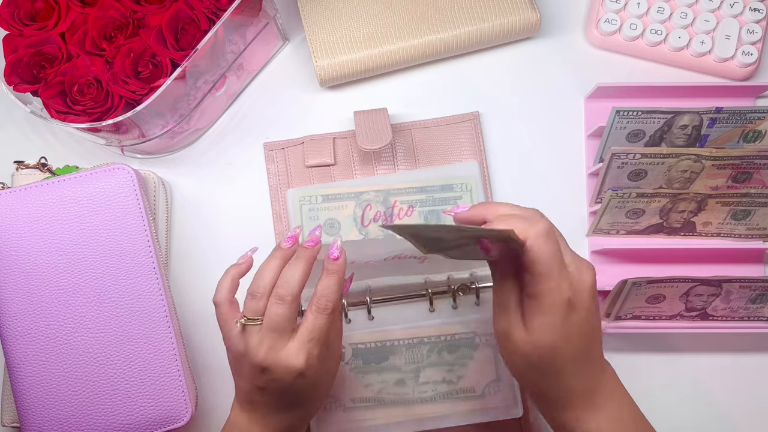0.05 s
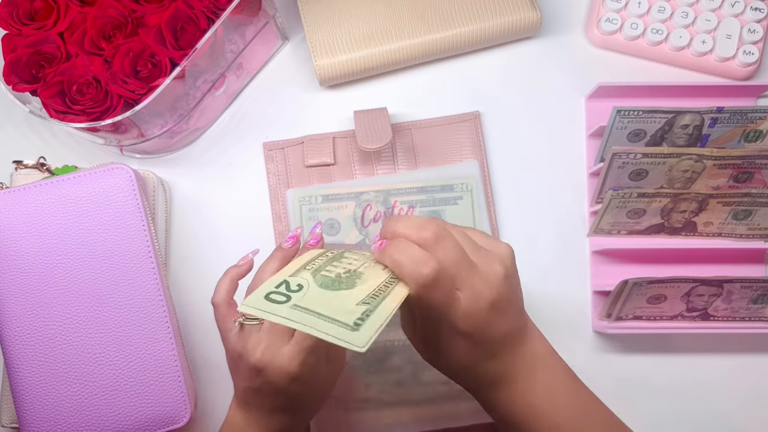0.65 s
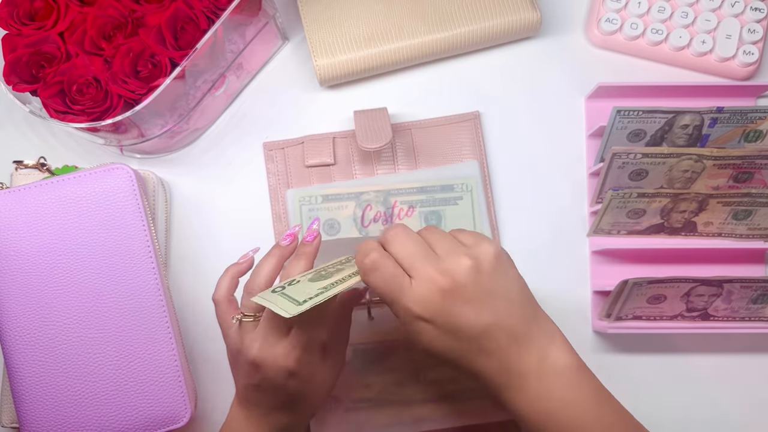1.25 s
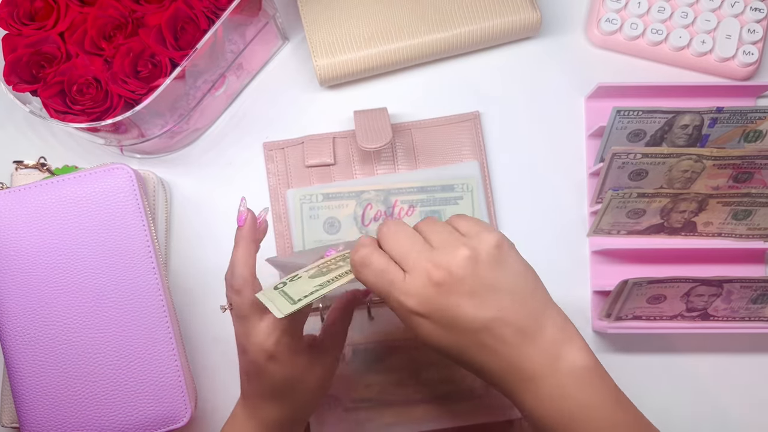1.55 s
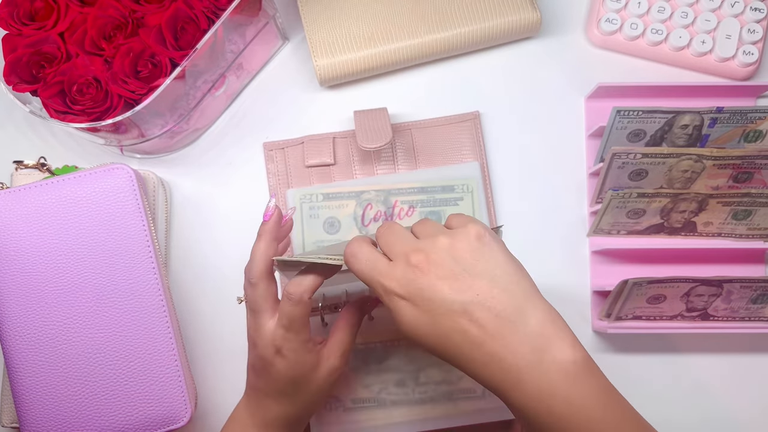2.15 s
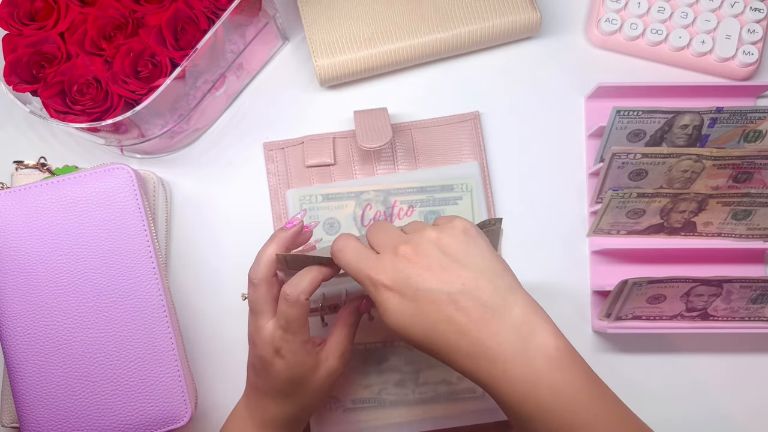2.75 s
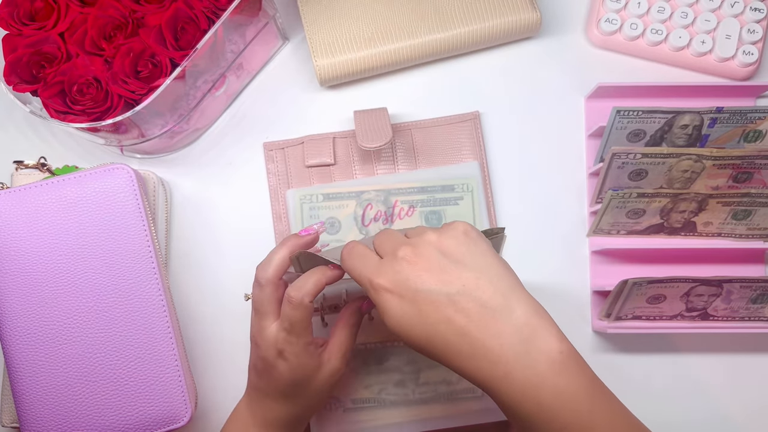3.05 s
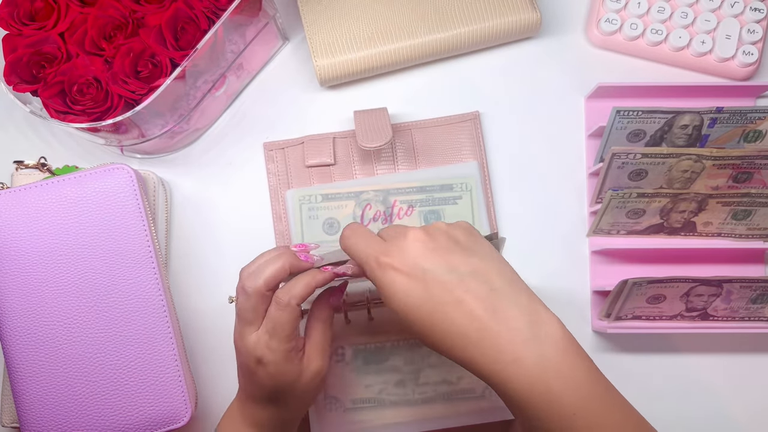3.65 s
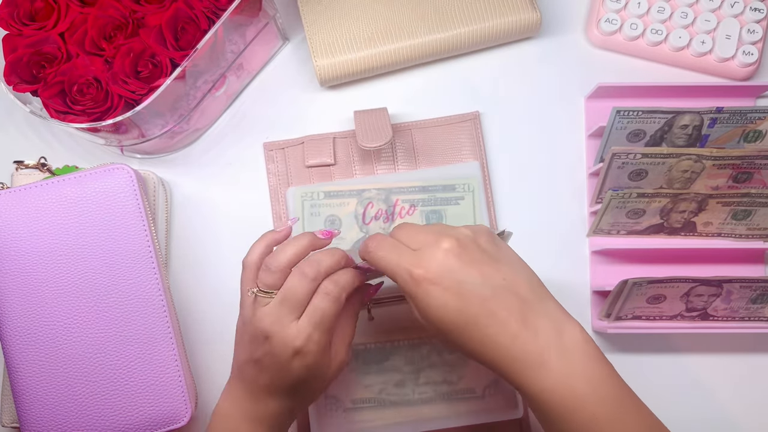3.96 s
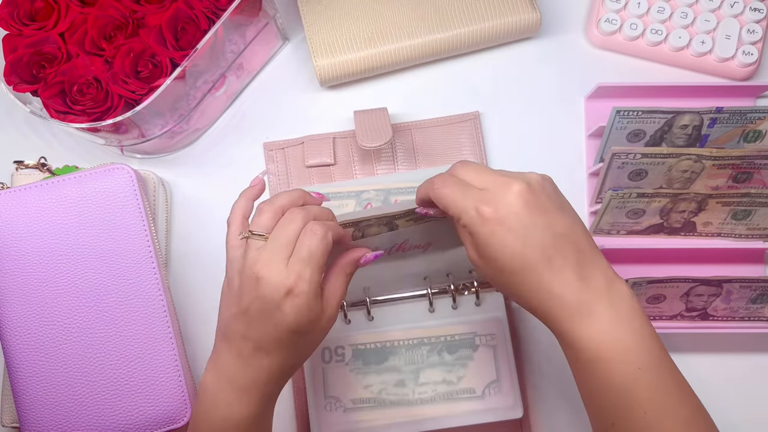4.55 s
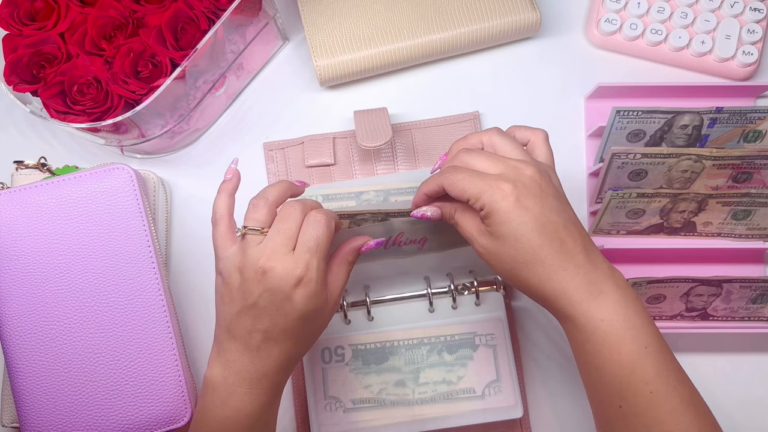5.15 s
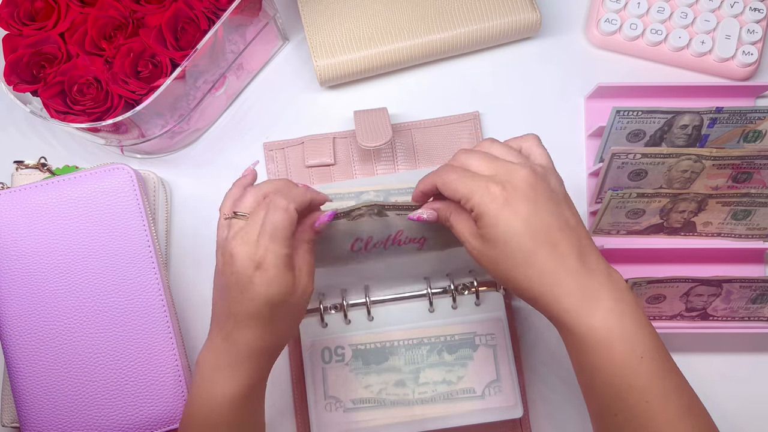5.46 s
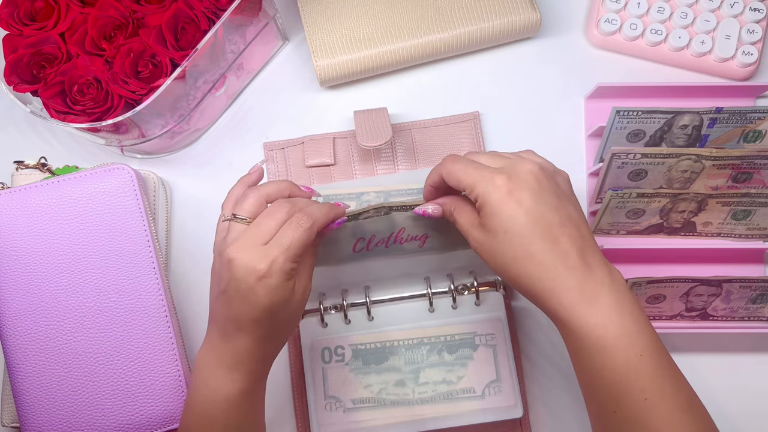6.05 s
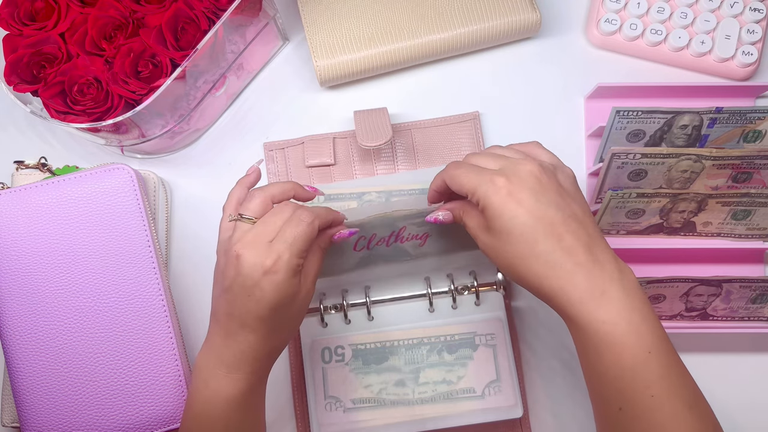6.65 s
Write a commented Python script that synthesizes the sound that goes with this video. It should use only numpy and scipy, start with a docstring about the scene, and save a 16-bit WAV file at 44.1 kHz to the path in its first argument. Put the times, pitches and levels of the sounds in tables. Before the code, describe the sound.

Paper banknotes rustle and crinkle as they are pushed into a plastic binder pocket, with small snaps over a steady low hum.

```python
"""A desk in a small room with a steady low hum. Close by, hands work a few banknotes into the
plastic pocket of a binder. Each short push of the fingers drags paper over plastic, so it hisses,
rubs and crinkles. Notes and pocket buckle with short snaps, and the binder answers with soft knocks.
Now and then a note's edge chatters along the plastic and sets a narrow resonance singing."""
import sys
import numpy as np
from scipy import signal
from scipy.fft import rfft, irfft, next_fast_len
from scipy.io import wavfile
from scipy.ndimage import uniform_filter1d, map_coordinates

SR = 44100
rng = np.random.default_rng(int(sys.argv[2]) if len(sys.argv) > 2 else 0)


def int16_out(signal):
    """Quantize to a 16-bit WAV file."""
    q = np.round(np.clip(np.atleast_2d(signal).T, -1, 1) * 32767)
    wavfile.write(sys.argv[1], SR, q.astype(np.int16))


N = 300762


def amp(db):
    """Decibels to gain."""
    return 10 ** (np.asarray(db) / 20)


def unit(x):
    """Scale to rms 1."""
    return x / np.sqrt(np.mean(x ** 2) + 1e-20)


def along(points, hz):
    """Read a curve of (freq_hz, value) points on a log frequency axis."""
    freqs, values = np.transpose(points)
    return np.interp(np.log(hz + 1), np.log(freqs + 1), values)


def wobble(rate_hz):
    """A smooth random modulator with rate_hz knots a second."""
    knots = rng.standard_normal(int(N * rate_hz / SR) + 4)
    return map_coordinates(knots, [np.arange(N) * rate_hz / SR])


def filtered(x, response):
    """Filter x by a gain given as a function of frequency."""
    n = x.shape[-1]
    padded = next_fast_len(n + 4096)
    return irfft(rfft(x, padded) * response(np.fft.rfftfreq(padded, 1 / SR)), padded)[..., :n]


def colour(x, spectrum, peaks=()):
    """Shape x with a broad EQ curve and resonant peaks, at rms 1."""
    def bumps_db(hz):
        return sum(db / (1 + (2 * (hz - centre) / width) ** 2) for centre, width, db in peaks)
    return unit(filtered(x, lambda hz: amp(along(spectrum, hz) + bumps_db(hz))))


def shimmer(x, depth_db):
    """Narrow peaks come and go in the sound, as they do when a sheet bends."""
    bands = signal.stft(x, nperseg=512)[2]
    drift = uniform_filter1d(rng.standard_normal(bands.shape), size=3, axis=0)  # smooth across bands
    drift = uniform_filter1d(drift, size=16, axis=1)  # and over time
    gain = amp(depth_db * unit(drift))
    return signal.istft(bands * unit(gain), nperseg=512)[1][:len(x)]


# The appliance's low rumble: freq_hz, gain_db
RUMBLE_EQ = [(22, -25), (31, -12), (40, -9), (47, 0.5), (55, 9.5), (66, 11.5), (78, 0.5), (92, 5),
             (110, -5), (130, -2.5), (146, 7), (158, -5), (170, -0.5), (200, -19), (300, -77)]
# The faint rush of air: freq_hz, gain_db
AIR_EQ = [(100, 2.5), (230, 2.5), (400, -6), (750, -21), (1900, -12.5), (3000, -35), (6000, -32),
          (10000, -39.5), (11500, -57.5), (16000, -72)]


def appliance_hum(hum_hz, hum_db, rumble_db, air_db):
    """An appliance drones at twice the mains rate over its own rumble and a faint rush of air."""
    tone = np.sqrt(2) * np.sin(2 * np.pi * hum_hz * np.arange(N) / SR)
    drone = tone * amp(hum_db + 0.44 * wobble(rate_hz=3.14))
    rumble = amp(rumble_db) * colour(rng.standard_normal(N), RUMBLE_EQ)
    air = amp(air_db) * colour(rng.standard_normal(N), AIR_EQ)
    return drone + rumble + air


# Light touch of notes and fingers on the pocket between strokes: time_s, hiss_db, rub_db
LIGHT_TOUCH = [(0, -66, -65), (0.23, -84.5, -80), (0.5, -64.5, -66.5), (0.76, -80, -100), (0.92, -84, -94),
               (1.04, -73, -75.5), (1.55, -88, -76.5), (2.0, -68.5, -68), (3.0, -69.5, -68.5),
               (4.15, -62, -60.5), (4.33, -71, -71.5), (4.53, -65.5, -61.5), (4.68, -82.5, -88),
               (5.03, -66, -62.5), (5.45, -67.5, -66.5), (5.61, -75.5, -76), (5.93, -69.5, -69),
               (6.8, -83.5, -77)]
# Pushes that slide the notes and rub the pocket: fastest_s, length_s, hiss_db, rub_db
FINGER_STROKES = [(0.076, 0.068, -58.5, -55.5), (0.32, 0.066, -76, -58.5), (0.464, 0.15, -51.5, -83),
                  (0.53, 0.12, -63.5, -58), (0.59, 0.062, -49, -61.5), (1.099, 0.12, -61.5, -62.5),
                  (1.279, 0.19, -56, -89), (1.388, 0.11, -52, -53), (1.599, 0.094, -57, -99),
                  (1.787, 0.1, -57.5, -71), (1.961, 0.13, -50, -52.5), (2.07, 0.1, -54.5, -59),
                  (2.207, 0.073, -55, -60), (2.322, 0.027, -55, -53), (2.376, 0.079, -57, -55.5),
                  (2.572, 0.15, -57.5, -55.5), (2.669, 0.16, -57, -62), (2.877, 0.11, -56.5, -55),
                  (3.03, 0.11, -52.5, -58), (3.241, 0.22, -55.5, -58), (3.429, 0.082, -53.5, -62.5),
                  (3.551, 0.052, -58.5, -56), (3.621, 0.06, -66.5, -70), (3.99, 0.071, -56, -58),
                  (4.102, 0.06, -52, -53.5), (4.163, 0.12, -52.5, -68), (4.414, 0.073, -60.5, -62),
                  (4.782, 0.073, -53, -57), (4.931, 0.15, -59.5, -64.5), (5.195, 0.028, -67, -54.5),
                  (5.446, 0.091, -64, -53), (5.714, 0.044, -59.5, -55.5), (5.878, 0.066, -61.5, -75),
                  (6.023, 0.053, -64.5, -52), (6.155, 0.059, -61.5, -65.5), (6.345, 0.036, -64, -53.5),
                  (6.434, 0.075, -65, -57), (6.506, 0.045, -67.5, -59.5), (6.698, 0.087, -61.5, -52)]


def hand_motion():
    """Hiss and rub envelopes in dB: light touch, swelling strokes and sheets settling after a snap."""
    t = np.arange(N) / SR
    touch_s, *touch_levels = np.transpose(LIGHT_TOUCH)
    power = amp([np.interp(t, touch_s, db) for db in touch_levels]) ** 2
    rise_share, roundness = 0.48, 1.29  # part of a stroke spent speeding up; 1 = pointed, 2 = round
    for fastest_s, length_s, hiss_db, rub_db in FINGER_STROKES:
        near = slice(*np.searchsorted(t, [fastest_s - 2 * length_s, fastest_s + 2 * length_s]))
        slope_s = length_s * np.where(t[near] < fastest_s, rise_share, 1 - rise_share)
        swell = np.exp(-(np.abs(t[near] - fastest_s) / slope_s) ** roundness)
        power[:, near] += (amp([[hiss_db], [rub_db]]) * swell) ** 2
    settle_hiss_db, settle_rub_db, settle_s = -27.5, -15.5, 0.2  # rustle under the snap and the knock
    for start_s, snap_db, _, knock_db, _ in BUCKLES:
        after = slice(*np.searchsorted(t, [start_s, start_s + settle_s]))
        fade = amp(-60 * (t[after] - start_s) / settle_s)
        power[:, after] += (amp([[snap_db + settle_hiss_db], [knock_db + settle_rub_db]]) * fade) ** 2
    return 10 * np.log10(power)


def crinkles(rate_hz, spread_db):
    """Envelope of small creases that pop at random, each dying in milliseconds; peaks near 1."""
    pops = (rng.random(N) < rate_hz / SR) * amp(spread_db * np.minimum(rng.standard_normal(N), 1))
    t60_s = 0.017
    tick = amp(-60 * np.arange(SR // 20) / SR / t60_s)
    return signal.fftconvolve(pops, tick)[:N]


def friction(rate_hz, spread_db, grain_db):
    """Smooth drag of the fibres plus a grain of tiny, uneven slips."""
    slips = (rng.random(N) < rate_hz / SR) * rng.choice([-1, 1], N)
    sizes = amp(spread_db * np.minimum(rng.standard_normal(N), 2))
    return rng.standard_normal(N) + amp(grain_db) * unit(slips * sizes)


# Bright hiss of sliding paper: freq_hz, gain_db
HISS_EQ = [(500, -65), (1200, -8.5), (2000, -3.5), (2600, -0.5), (4000, 1), (5500, -6.5), (7500, -19),
           (11000, -49)]
# Fine fizz on top of the hiss: freq_hz, gain_db
FIZZ_EQ = [(3500, -5.5), (6200, -1.5), (8000, -2), (10000, -3.5), (11300, -46), (15500, -25)]
# Dull rub of the pocket: freq_hz, gain_db
RUB_EQ = [(250, -20.5), (450, -10.5), (600, -0.5), (850, -2), (1150, -2.5), (1700, -7.5), (3000, -71)]
# Low thud of the binder: freq_hz, gain_db
THUD_EQ = [(100, -0.5), (200, -0.5), (300, 3), (480, -1.5), (700, -24), (1200, -69)]
# Resonances of the plastic pocket: pitch_hz, width_hz, boost_db
POCKET_MODES = [(2040, 280, 5.6), (2360, 280, 5), (2830, 110, 3.3), (3600, 30, 2.6), (4400, 490, 2.1),
                (6160, 550, 6.8)]
# Resonances of the binder: pitch_hz, width_hz, boost_db
BINDER_MODES = [(302, 180, 3), (429, 32, 5), (649, 46, 11), (803, 95, 8.5), (1036, 44, 7.5), (1320, 150, 5)]
# The hand's weight on the binder, heavy when pushing, light on the fingertips: time_s, thud_gain_db
HAND_WEIGHT = [(0, -4), (2.0, 0.5), (4.2, -5), (4.6, -6.5), (5.5, -2.5), (6.0, -6), (6.8, -12)]


def sliding_notes(hiss_trim_db, fizz_trim_db, rub_trim_db, thud_trim_db, flutter_db):
    """Notes drag and crinkle in the pocket, brighter when faster, fluttering under an uneven push."""
    hiss_db, rub_db = hand_motion()
    brisk_db, fizz_growth = -55, 1.23  # hiss of a brisk stroke; dB of fizz per dB of hiss
    fizz_db = brisk_db + fizz_growth * (hiss_db - brisk_db)
    weight_db = np.interp(np.arange(N) / SR, *np.transpose(HAND_WEIGHT))
    grip_db = np.minimum(rub_db - hiss_db, 4)  # gripped sheets crease, gliding ones stay smooth
    crease = amp(grip_db + 6.5) * crinkles(rate_hz=30, spread_db=3)
    # each crease jolts the paper and the plastic around it together
    paper = friction(rate_hz=200, spread_db=2.0, grain_db=-8) + crease * rng.standard_normal(N)
    plastic = friction(rate_hz=120, spread_db=2.5, grain_db=-4.5) + crease * rng.standard_normal(N)
    hiss = amp(hiss_db + hiss_trim_db) * colour(paper, HISS_EQ, POCKET_MODES)
    fizz = amp(fizz_db + fizz_trim_db) * colour(paper, FIZZ_EQ)
    rub = amp(rub_db + rub_trim_db) * colour(plastic, RUB_EQ, BINDER_MODES)
    thud = amp(rub_db + weight_db + thud_trim_db) * colour(rng.standard_normal(N), THUD_EQ, BINDER_MODES)
    flutter = amp(flutter_db * wobble(rate_hz=90))
    return flutter * (shimmer(hiss + fizz, depth_db=3) + shimmer(rub + thud, depth_db=2.5))


def burst(spectrum, peaks, rise_s, t60_s):
    """A crowd of close modes swells as a fold runs across the sheet, then dies."""
    t = np.arange(SR // 6) / SR
    envelope = (1 - np.exp(-(t / rise_s) ** 2)) * amp(-60 * t / t60_s)
    envelope /= envelope.max()
    noise = colour(rng.standard_normal(len(t)), spectrum, peaks)
    return unit(envelope * noise) * np.sqrt(np.mean(envelope ** 2))


# Body of a snap: freq_hz, gain_db
SNAP_EQ = [(500, -18), (1200, -5), (2100, 0.5), (4000, -2.5), (5500, -9), (8000, -33), (12000, -60.5)]
# Crisp top edge of a snap: freq_hz, gain_db
EDGE_EQ = [(3500, -12), (6000, 7.5), (8000, -1.5), (10000, -2.5), (12000, -29.5), (15500, -13.5)]
# A note or the pocket buckles: start_s, snap_db, pitch_hz, knock_db, edge_db
BUCKLES = [(0.0315, -44, 1960, -76, -69), (0.0567, -37.5, 2110, -61, -47.5), (0.1452, -57, 1550, -57, -75),
           (0.273, -51, 1950, -49.5, -64), (0.9457, -47.5, 2000, -64, -76), (1.0252, -40, 2060, -60, -75),
           (1.366, -28, 2220, -42, -40), (1.384, -31, 1950, -41, -56), (1.9274, -31.5, 3570, -58, -42.5),
           (1.942, -27.5, 3600, -49.5, -38.5), (2.4389, -40.5, 2240, -57.5, -83),
           (2.4636, -40.5, 1540, -71, -75), (2.51, -36, 2260, -47.5, -67.5), (2.6137, -39, 2260, -61, -54),
           (2.6492, -38, 3400, -50.5, -50.5), (2.6625, -29.5, 2400, -49, -44),
           (2.7849, -26.5, 4160, -42, -42), (2.867, -37.5, 1460, -45.5, -73), (3.1645, -38, 2060, -44, -56),
           (3.1754, -32.5, 2080, -50, -50), (3.2672, -35.5, 2300, -53.5, -70),
           (3.5812, -34, 1970, -43, -70), (3.7085, -46.5, 2160, -63, -62), (3.7529, -39.5, 2190, -52, -59),
           (3.8844, -42, 1900, -50, -64), (3.923, -30, 2640, -50.5, -43.5), (4.1455, -41, 2750, -67, -46),
           (4.4054, -35.5, 2640, -54, -48), (4.4178, -35.5, 2740, -49, -73),
           (4.569, -43.5, 2540, -47.5, -65), (4.816, -44, 2680, -53, -75), (4.9345, -18, 2600, -39, -52),
           (5.007, -40, 2500, -46.5, -47), (5.015, -39, 2670, -47.5, -55),
           (5.2634, -47.5, 2780, -62.5, -66), (5.3681, -38, 3300, -56.5, -48),
           (5.4345, -48.5, 2900, -52, -72), (5.4736, -42.5, 3000, -54, -55), (5.6887, -52, 3280, -73, -52),
           (5.837, -48, 2030, -57, -62.5), (5.8623, -39.5, 3980, -53.5, -58), (6.0385, -43, 2600, -46, -65),
           (6.4081, -38, 1600, -57, -45), (6.6753, -47.5, 1520, -70, -80)]


def buckling_snaps(snap_trim_db, edge_trim_db, knock_trim_db, thud_trim_db):
    """Each buckle cracks at the sheet's two modes and nudges the binder, which rings lower and longer."""
    ring_db, ring_width_hz = 13, 330
    rise_s, snap_t60_s, knock_t60_s = 0.00259, 0.024, 0.083
    out = np.zeros(N + SR)
    for start_s, snap_db, pitch_hz, knock_db, edge_db in BUCKLES:
        sheet_modes = [(pitch_hz, ring_width_hz, ring_db),
                       (1.625 * pitch_hz, ring_width_hz, 0.49 * ring_db)]
        snap = amp(snap_db + snap_trim_db) * burst(SNAP_EQ, sheet_modes, rise_s, snap_t60_s)
        edge = amp(edge_db + edge_trim_db) * burst(EDGE_EQ, [], rise_s, snap_t60_s)
        detune = np.exp(0.059 * rng.standard_normal())  # the fingers hold the cover differently each time
        cover_modes = np.asarray(BINDER_MODES) * [detune, 1, 1]
        knock = amp(knock_db + knock_trim_db) * burst(RUB_EQ, cover_modes, rise_s, knock_t60_s)
        thud_db = knock_db + np.interp(start_s, *np.transpose(HAND_WEIGHT)) + thud_trim_db
        # the heavy cover moves later
        thud = amp(thud_db) * burst(THUD_EQ, cover_modes, 2 * rise_s, knock_t60_s)
        onset = round((start_s - rise_s / 2) * SR)  # the fold starts to give just before the crack
        out[onset:][:len(snap)] += snap + edge + knock + thud
    return out[:N]


# A note's edge catches on the plastic: middle_s, length_s, pitch_hz, level_db
EDGE_SCRAPES = [(0.589, 0.057, 3880, -49.5), (0.606, 0.081, 6230, -59), (1.265, 0.12, 3800, -60.5),
                (3.042, 0.17, 2240, -63.5), (4.146, 0.02, 2680, -43), (4.186, 0.14, 2660, -67),
                (4.769, 0.11, 2540, -59)]


def edge_scrapes(width_hz):
    """A note's edge chatters along the plastic, feeding stick-slip noise to one narrow resonance."""
    out = np.zeros(N + SR)
    for middle_s, length_s, pitch_hz, level_db in EDGE_SCRAPES:
        swell = np.hanning(round(length_s * SR))
        chatter = rng.standard_normal(len(swell))
        ring = unit(filtered(chatter, lambda hz: 1 / (1 + (2 * (hz - pitch_hz) / width_hz) ** 2)))
        onset = round((middle_s - length_s / 2) * SR)
        out[onset:][:len(ring)] += amp(level_db) * swell * ring
    return out[:N]


# Stereo width, as side level against the centre: freq_hz, side_db
STEREO_WIDTH = [(60, -27.5), (170, -16), (350, -3), (700, 3.5), (1200, 1), (1700, -30), (2400, -7.5),
                (3200, -1.5), (4400, -5.5), (8000, 1.5), (10000, 8), (12000, 22.5)]


def widen(x, lag_s, shimmer_db):
    """Left and right differ by a slightly late copy whose colour keeps shifting."""
    side = filtered(shimmer(x, shimmer_db),
                    lambda hz: amp(along(STEREO_WIDTH, hz)) * np.exp(-2j * np.pi * hz * lag_s))
    return np.array([x + side, x - side])


# Decay of the small room, shorter in the treble: freq_hz, t60_s
ROOM_DECAY = [(200, 0.39), (1000, 0.39), (4000, 0.25), (10000, 0.19)]


def room_reverb(x, build_s):
    """The walls' diffuse answer, one tail for each channel."""
    hz, t, bands = signal.stft(rng.standard_normal((2, SR // 2)), SR, nperseg=256)
    decay = amp(-60 * t / along(ROOM_DECAY, hz)[:, None])
    attack = 1 - np.exp(-t / build_s)
    tail = signal.istft(bands * decay * attack, SR, nperseg=256)[1]
    return signal.fftconvolve(x[None], tail / np.linalg.norm(tail[0]), axes=1)[:, :N]


def scene():
    """The hands up close, a little room behind them and the hum as a bed."""
    hands = sliding_notes(hiss_trim_db=-3, fizz_trim_db=-7, rub_trim_db=-4, thud_trim_db=-3.5,
                          flutter_db=1.46)
    hands += edge_scrapes(width_hz=200)
    hands += buckling_snaps(snap_trim_db=-8, edge_trim_db=-4, knock_trim_db=-1, thud_trim_db=-3)
    hum = appliance_hum(hum_hz=120, hum_db=-50, rumble_db=-52, air_db=-68)
    close = widen(hands, lag_s=0.000895, shimmer_db=6.5)
    reverb = amp(-10) * room_reverb(hands, build_s=0.0028)
    return close + reverb + widen(hum, lag_s=0.0016, shimmer_db=2)


def record(dry):
    """The microphone keeps nothing above its band limit."""
    top_hz = 15800
    return filtered(dry, lambda hz: hz < top_hz)


dry = scene()
out = record(dry)
int16_out(out)
```